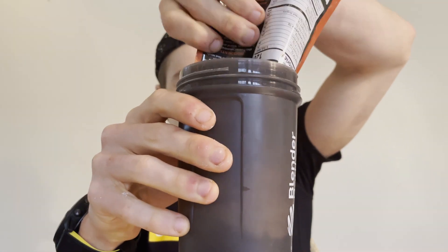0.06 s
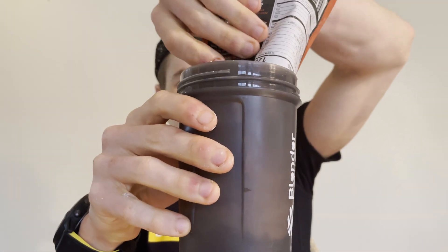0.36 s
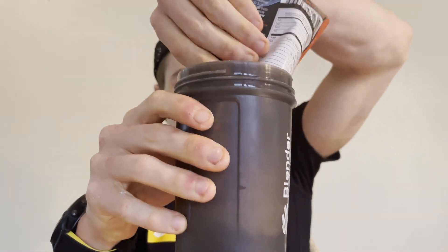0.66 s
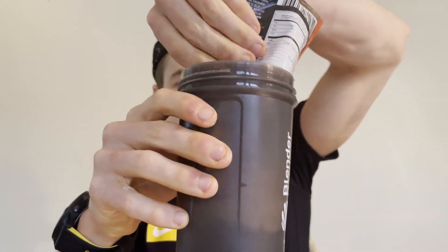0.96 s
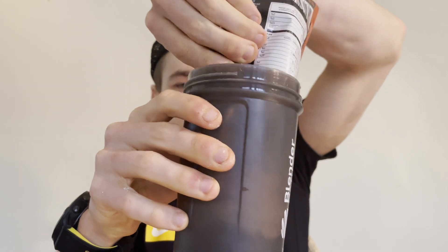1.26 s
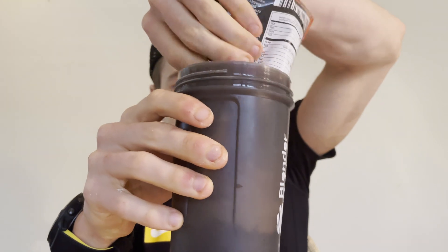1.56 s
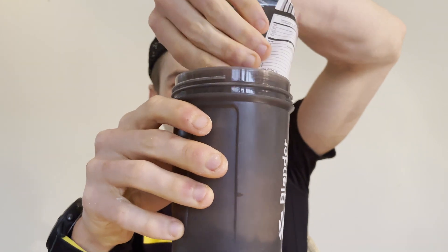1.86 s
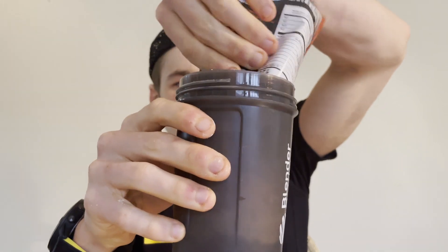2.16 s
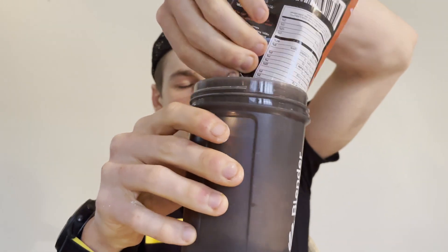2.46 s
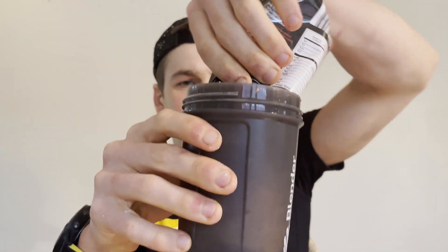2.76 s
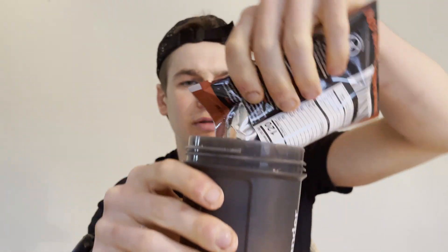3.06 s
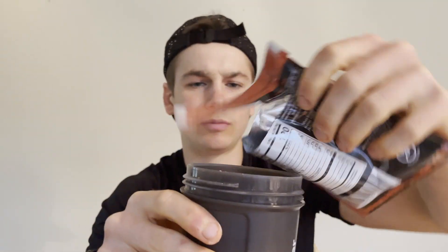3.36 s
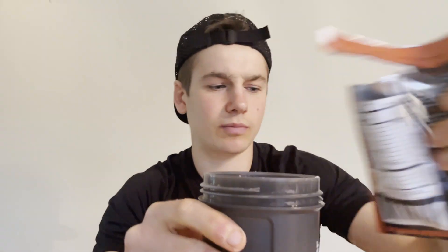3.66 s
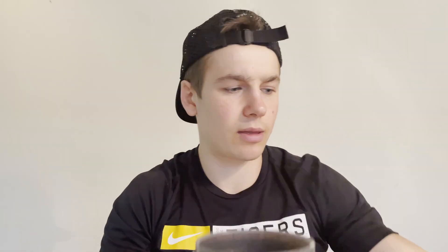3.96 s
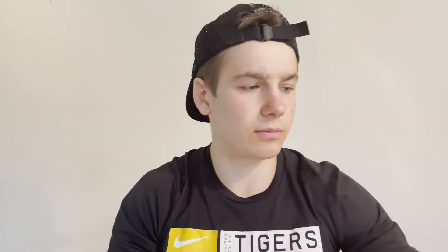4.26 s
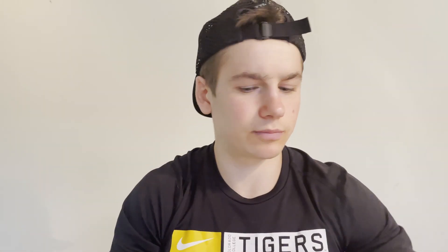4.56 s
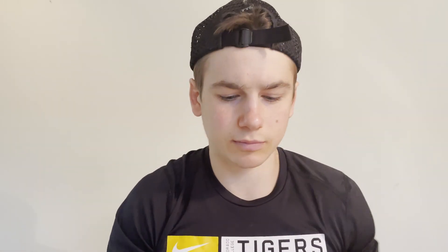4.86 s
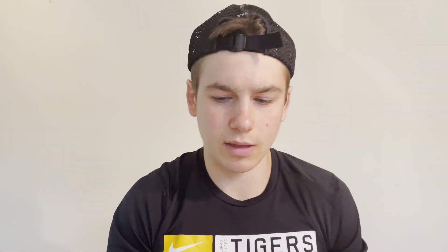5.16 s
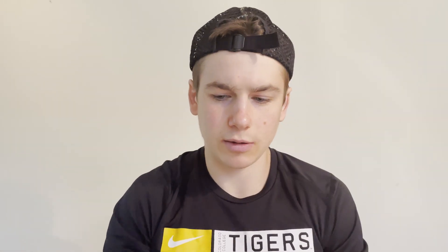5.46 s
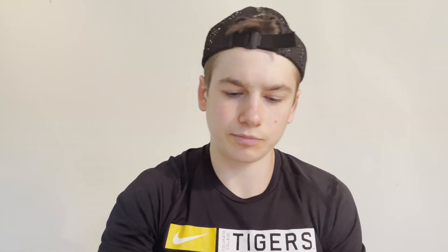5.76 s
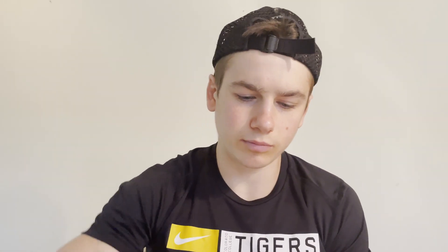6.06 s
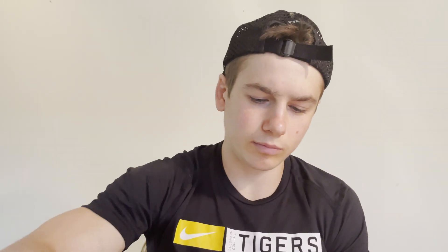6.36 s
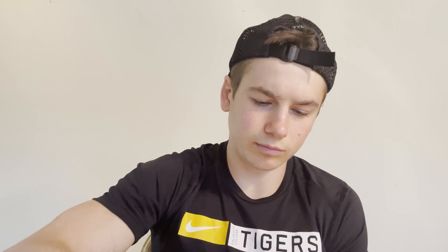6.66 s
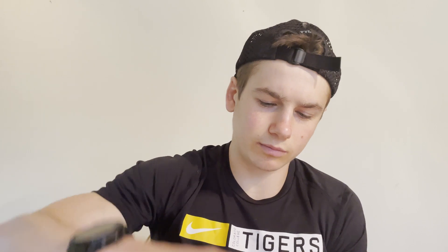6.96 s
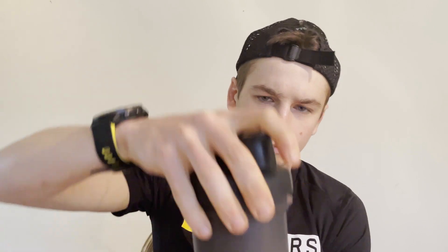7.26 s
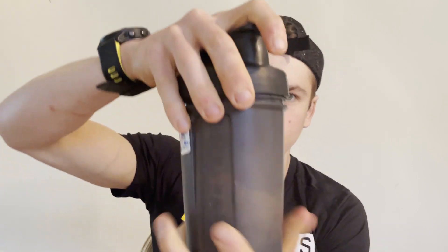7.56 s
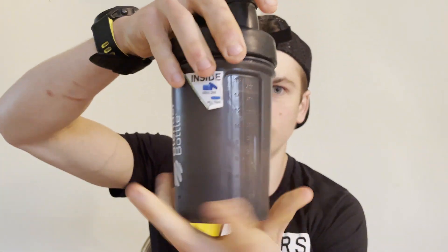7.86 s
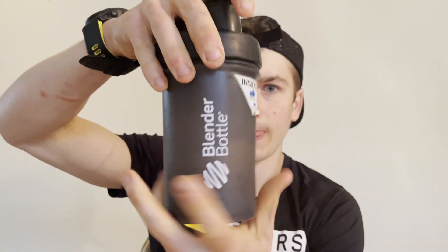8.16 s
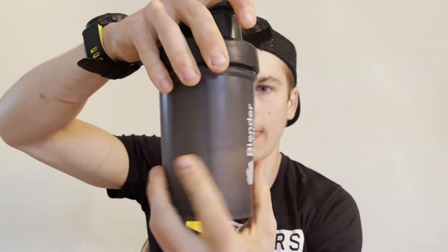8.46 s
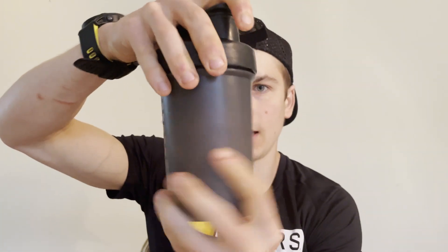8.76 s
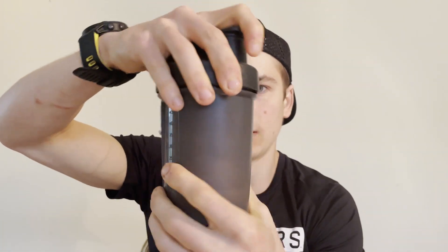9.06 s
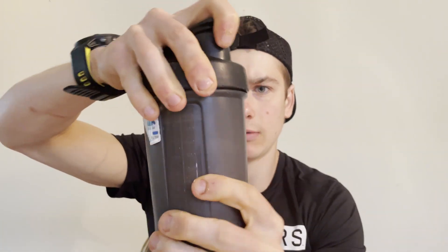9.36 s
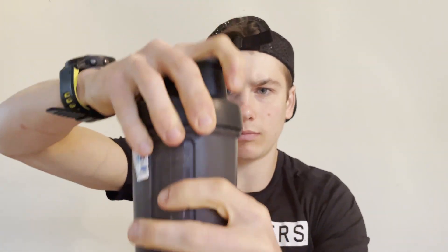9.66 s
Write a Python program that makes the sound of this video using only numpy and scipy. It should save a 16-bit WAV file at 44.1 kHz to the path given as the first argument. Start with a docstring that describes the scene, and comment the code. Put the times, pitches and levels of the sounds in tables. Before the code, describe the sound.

Close to a stereo microphone in a small room with a short echo, foil crinkles in quick shakes and powder slides into a plastic cup. After a brief rustle and a lull, the cup knocks hard on a ringing table, followed by several hollow lid clacks. A faint wire rattle follows, then quiet thread scraping, sliding fingers and light hollow taps as the lid is tightened.

```python
"""A table in a small room, a stereo microphone pair close to the hands. First a foil packet is shaken out
into a plastic shaker cup: the foil crackles and snaps as it buckles, and powder hisses down it.
Near 4.5 s the packet is laid aside; at 5.8 s the cup is knocked down on the table, then its lid clacks on.
At 7 s the cup is lifted and its wire whisk rings faintly. To the end it is turned hand over hand
to screw the lid tight, the thread scraping and the fingers sliding, over quiet room air."""
import sys
import numpy as np
from scipy import signal
from scipy.fft import rfft, irfft, next_fast_len
from scipy.io import wavfile

SR = 44100
rng = np.random.default_rng(int(sys.argv[2]) if len(sys.argv) > 2 else 0)


def store_wav(level_fs):
    """Save 16-bit WAV to argv[1]."""
    pcm = np.round(np.clip(np.atleast_2d(level_fs), -1, 1) * 32767)
    wavfile.write(sys.argv[1], SR, pcm.T.astype(np.int16))


N = 433062

# the foil buckles, close to the microphones: (time [s], level [dB], treble [dB], pitch [Hz])
SNAPS = [(0.006, -27, -3.5, 3290), (0.057, -19, -19.5, 1840), (0.164, -23.5, -27.5, 1910),
         (0.237, -17.5, -15.5, 1410), (0.307, -18.5, -17.5, 2050), (0.315, -22.5, -34.5, 660),
         (0.542, -20.5, -37, 626), (0.665, -27.5, -17.5, 660), (0.766, -22, -32.5, 1460),
         (0.915, -26, -13, 1430), (0.944, -26, -35, 650), (1.04, -23, -44, 1450), (1.113, -28.5, -20, 1520),
         (1.238, -29, -20, 1350), (1.349, -26.5, -21, 720), (1.433, -22.5, -48, 1380),
         (1.469, -17, -28, 1980), (1.624, -19, -21.5, 630), (1.655, -23, -16, 670),
         (2.047, -19.5, -26, 1390), (2.236, -21.5, -21, 650), (2.389, -26, -29, 1930),
         (2.54, -26.5, -47, 690), (2.69, -28.5, -21, 1780), (2.856, -25.5, -23, 1400),
         (2.961, -23.5, -26, 625), (2.976, -27.5, -35.5, 570), (3.02, -19, -69, 1390),
         (3.211, -32, -22, 1420), (3.27, -25.5, -29.5, 1300), (3.409, -19, -21, 1650),
         (3.443, -31.5, -15, 750), (3.552, -35, -22, 2140), (3.587, -64, 3, 2260), (3.686, -72, 1, 2820),
         (3.805, -46.5, -14.5, 1580), (3.987, -61.5, -2.5, 2000), (4.062, -55.5, -4.5, 2400),
         (4.388, -46.5, -8.5, 1040), (4.526, -40, 1.5, 1020), (4.611, -29.5, -18.5, 1170),
         (4.765, -47, -3, 3500), (5.146, -66.5, 2.5, 3930), (5.261, -54.5, -4, 1880)]
# spectrum of one snap: (frequency [Hz], level [dB])
SNAP_COLOUR = [(47, -49.5), (80, -4), (615, -3), (896, 0.5), (1530, 1), (1740, -9), (2040, 2), (3000, -7),
               (6590, -17), (9820, -25.5), (14600, -26.5), (16000, -50)]
# resonances of the foil at the cup's mouth: (frequency [Hz], level [dB], t60 [s])
FOIL_MODES = [(325.5, -12, 0.087), (592, -19.5, 0.045), (627, -6.5, 0.069), (1425, -3, 0.012),
              (1561, 3.5, 0.045), (1964, 1.5, 0.043), (2284, -7.5, 0.06), (2420, -16, 0.031)]
def foil_snaps(delay_s=.004, loss_db=8.5, pitch_ratio=1.4, bass_db=-34):
    """Each buckle of the foil sets off a weaker one in the facet beside it."""
    rows = []
    for (s, db, treble_db, hz), (late, detune) in zip(SNAPS, rng.uniform(.6, 1.4, (len(SNAPS), 2))):
        rows.append((s, db, treble_db, bass_db, hz))
        rows.append((s + late * delay_s, db - loss_db, treble_db, bass_db, hz * pitch_ratio * detune))
    return blows(rows, SNAP_COLOUR, FOIL_MODES, spread_s=.0018,
                 patch_db=8.5, ring_db=0, body_db=-30, treble_db=-17.5, bass_db=-13)


# shakes over the cup: (time [s], hold [s], crinkle [dB], powder hiss [dB])
SHAKES = [(0.002, 0.005, -30.5, -43), (0.237, 0.054, -43, -40.5), (0.535, 0.036, -43, -46),
          (0.677, 0.072, -36.5, -45.5), (0.895, 0.026, -43.5, -46), (1.035, 0.08, -40.5, -50),
          (1.255, 0.075, -39, -44.5), (1.44, 0.085, -37, -43.5), (1.66, .02, -38.5, -43.5),
          (1.787, 0.072, -40, -48), (2.005, 0.065, -34.5, -43), (2.183, 0.081, -37.5, -46.5),
          (2.415, 0.069, -32.5, -45), (2.59, 0.056, -33, -42.5), (2.964, 0.0083, -43, -53),
          (3.412, 0.014, -52, -55.5)]
SHAKE_RISE_DB_PER_S, SHAKE_FALL_DB_PER_S = 599, 349.5
# the foil stirs in the hand and loose powder trickles inside it: (time [s], level [dB])
HOLDING = [(0, -51.5), (2.65, -58), (2.78, -54.5), (3.05, -61), (3.18, -69), (3.25, -56.5), (3.45, -67.5),
           (3.7, -73.5), (4.3, -76.5), (4.92, -98), (5.15, -95.5), (5.4, -81), (5.65, -86.5)]
TRICKLE = [(0, -61.5), (2.7, -60), (3.17, -74.5), (3.5, -72.5), (4.1, -68), (4.22, -73.5), (4.75, -71),
           (4.9, -99), (5.6, -100.5)]
# spectra of crinkling foil and sliding powder: (frequency [Hz], level [dB])
FOIL_COLOUR = [(80, -13), (200, -11), (330, -3), (480, -12), (650, -1.5), (860, -11.5), (1150, -14),
               (1420, -1), (1720, -13), (2000, -2.5), (3200, -13.5), (6700, -22), (10000, -25),
               (15000, -22)]
POWDER_COLOUR = [(2500, -6), (4500, -0.5), (6700, 3.5), (9000, -1.5), (10500, -4), (12500, 3),
                 (16000, -2.5)]
def pouring():
    """Every shake sends a swarm of crinkles into the cup's mouth; powder slides, relaxing foil ticks."""
    shaken, poured = strokes(SHAKES, SHAKE_RISE_DB_PER_S, SHAKE_FALL_DB_PER_S)
    crinkle, trickle = np.hypot(shaken, gain_curve(HOLDING)), gain_curve(TRICKLE)
    creases = crinkle * grains(per_s=1500, spread_db=2)
    strength = np.sqrt(np.mean(creases ** 2))
    mouth = amp(-15) * unit(signal.oaconvolve(creases, ringing(FOIL_MODES, SR // 5))[:N])
    crackle = amp(-9) * colour(creases, FOIL_COLOUR)
    flipping = amp(-7) * colour(crinkle * facets(), FOIL_COLOUR)
    hiss = colour(grains(per_s=2300, spread_db=2.5), POWDER_COLOUR)
    powder = amp(-2) * np.hypot(poured, trickle) * hiss
    ticks = amp(-1) * trickle * colour(grains(per_s=31, spread_db=2), POWDER_COLOUR)
    return strength * (crackle + mouth + flipping) + powder + ticks


def facets(t60_cycles=22):
    """Each flipping facet of foil rings briefly at a pitch of its own; rms 1."""
    out = np.zeros(N)
    for hz in np.geomspace(550, 4500, 14):
        flips = grains(per_s=22, spread_db=3)
        ring = unit(ringing([(hz, 0, t60_cycles / hz)], SR // 25))
        out += signal.oaconvolve(flips, ring)[:N]
    return unit(out)


# the cup meets the table: (time [s], level [dB], treble [dB], bass [dB], pitch [Hz])
KNOCKS = [(5.733, -22, -23.5, -12, 4480), (5.797, -7, -41, -30, 1150), (5.807, -13, -36, -9.5, 840),
          (6.668, -30.5, -19, 0, 430)]
# spectrum of one knock: (frequency [Hz], level [dB])
TABLE_COLOUR = [(29, -46), (50, -16.5), (87, -12.5), (246, -15.5), (362, -1), (439, -13.5), (586, 0.5),
                (1120, -1), (1820, -18), (2210, -21), (2810, -31.5), (6240, -54), (9410, -67.5),
                (16000, -68.5)]
# resonances of the table under the cup: (frequency [Hz], level [dB], t60 [s])
TABLE_MODES = [(134, -21.5, 1), (245, -22.5, 0.55), (400, -19.5, 1), (546, -4, 0.071), (606, -5.5, 0.4),
               (770, 0, 0.32), (853, -6, 0.28), (970, -8, 0.3), (1110, -7.5, 0.28), (1140, -29, 0.96),
               (1564, -7.5, 0.26), (1530, -23.5, 0.34), (1680, -34.5, 0.33), (2126, -30, 0.3)]
def cup_knocks():
    """The cup lands on one edge, then flat, and the table rings."""
    return blows(KNOCKS, TABLE_COLOUR, TABLE_MODES, spread_s=.0012,
                 patch_db=-6, ring_db=-8, body_db=-23, treble_db=-6, bass_db=-18.5)


# the lid strikes the rim: (time [s], level [dB], treble [dB], bass [dB], pitch [Hz])
CLACKS = [(6.12, -25, -29, -29, 550), (6.142, -10.5, -21, -16, 1950), (6.331, -14.5, -19.5, -17.5, 800),
          (6.405, -22, -30, -15.5, 390), (6.417, -22, -29, -16, 374), (6.432, -12, -22, -23, 3116),
          (6.841, -46.5, -33, -17, 795), (8.539, -57.5, -11.5, -0.5, 793), (8.972, -41.5, -9.5, -31, 2100),
          (8.995, -50, -15, -36, 894), (9.116, -47, -19, -24.5, 2030), (9.145, -40, -17.5, -21, 1540),
          (9.638, -51.5, -14, -16, 770)]
# spectrum of one clack: (frequency [Hz], level [dB])
LID_COLOUR = [(29, -38.5), (50, -19), (306, 5), (472, -12.5), (1270, -9), (1960, -18.5), (2560, -15.5),
              (3100, -14.5), (5530, -19), (6710, -22), (9180, -31.5), (14900, -29.5), (16000, -48)]
# resonances of the lid: (frequency [Hz], level [dB], t60 [s])
LID_MODES = [(140, 1, .14), (250, -6, .08), (335, 1, .09), (535, -1, .06), (780, -4, .06), (1040, 2, .025),
             (1900, -3, .008), (2850, -6, .012), (3400, -6, .012)]
def lid_clacks():
    """The hollow lid clatters onto the rim, and later clicks softly as it is tightened."""
    return blows(CLACKS, LID_COLOUR, LID_MODES, spread_s=.0013,
                 patch_db=3, ring_db=-3, body_db=-25.5, treble_db=-10.5, bass_db=-12)


# turns of the cup under its lid: (time [s], hold [s], thread scrape [dB], sliding skin [dB])
TURNS = [(7.325, 0.068, -58.5, -60), (7.41, 0.056, -52, -53), (7.62, 0.036, -73.5, -71),
         (7.775, 0.023, -58.5, -59.5), (8.095, 0.054, -66, -61), (8.36, 0.028, -62.5, -63),
         (8.615, 0.039, -56, -60.5), (8.845, 0.04, -51.5, -53), (8.99, 0.013, -49, -60),
         (9.165, 0.21, -54.5, -64.5), (9.33, .11, -57, -67), (9.545, 0.028, -79, -59.5),
         (9.68, 0.064, -77, -60.5)]
# rumble of the hands carrying the cup: (time [s], level [dB])
CARRYING = [(6.7, -37), (6.88, -53.5), (7.04, -77.5), (7.1, -62), (7.5, -55), (8.9, -55.5), (9.3, -80),
            (9.82, -68)]
# spectra of thread, skin and handling rumble: (frequency [Hz], level [dB])
THREAD_COLOUR = [(250, -19), (600, -5), (950, 1.5), (1200, -4.5), (1500, 1), (2100, -0.5), (3000, -9),
                 (5000, -7), (9000, -48)]
SKIN_COLOUR = [(1500, -7.5), (3000, -6.5), (4500, -5), (6500, -0.5), (9000, -9.5), (10500, -11),
               (12500, -3), (16000, -12.5)]
RUMBLE_COLOUR = [(30, -28), (65, -5), (140, -7), (250, -6), (400, -16.5), (900, -36)]
def screwing():
    """The thread scrapes round, fingers slide on the wall, and the cup rumbles in the hands."""
    scrape, slide = strokes(TURNS, rise_db_per_s=399, fall_db_per_s=228)
    turning = amp(-59) * (scrape / scrape.max()) ** .4   # follows 40% of the scrape's swing in dB
    handling = np.hypot(gain_curve(CARRYING), turning)
    thread = amp(-4.5) * scrape * colour(grains(per_s=4000, spread_db=3), THREAD_COLOUR)
    skin = slide * colour(rng.standard_normal(N), SKIN_COLOUR)
    rumble = amp(-12.5) * handling * colour(rng.standard_normal(N), RUMBLE_COLOUR)
    return thread + skin + rumble


# light touches on the cup: (time [s], level [dB], treble [dB], bass [dB], pitch [Hz])
BUMPS = [(1.255, -38.5, -40, -23, 151), (1.851, -30, -17, -26.5, 350), (2.017, -39.5, -23, -27, 278),
         (7.076, -56, -28.5, -1.5, 231), (7.147, -72.5, -12, 15.5, 143.4), (7.169, -70, -7, -2, 109),
         (7.215, -55.5, -21, -2.5, 159), (7.311, -62.5, 2.5, 2.5, 269), (7.928, -51, -21.5, -4.5, 147.8),
         (8.087, -36, -28, -22.5, 244), (8.214, -51, -23.5, -8, 160.5), (8.38, -37, -32, -22, 149),
         (8.429, -45, -34, -23, 103), (8.569, -45, -24, -18, 386), (8.631, -35.5, -36, -23, 199),
         (8.654, -45.5, -10.5, -33, 725), (8.797, -46, -24, -16, 278), (8.845, -37.5, -24, -24, 318)]
# spectrum of one touch: (frequency [Hz], level [dB])
BUMP_COLOUR = [(29, -40), (50, -7), (189, 5.5), (586, -2), (765, 0.5), (1180, -10), (2060, -12),
               (2560, -30.5), (4350, -31.5), (16000, -53)]
# resonances of the cup: (frequency [Hz], level [dB], t60 [s])
CUP_MODES = [(107.5, -51, 0.16), (156.4, -16, 0.23), (284, 7.5, 0.14), (430, 10, 0.22), (577, -35, 0.035),
             (770, -25, 0.084)]
def cup_bumps():
    """The packet or a finger bumps the cup, which answers with a low, hollow ring."""
    return blows(BUMPS, BUMP_COLOUR, CUP_MODES, spread_s=.0033,
                 patch_db=1.5, ring_db=-8, body_db=-24.5, treble_db=-12.5, bass_db=-3)


# the packet is pushed about on the table: (time [s], hold [s], level [dB])
PUSHES = [(4.395, 0.026, -51.5), (4.46, 0.02, -46), (4.525, 0.012, -45.5), (4.605, 0.014, -45.5),
          (4.73, 0.032, -47), (5.268, 0.0086, -65.5)]
# spectrum of its rustle: (frequency [Hz], level [dB])
PUSH_COLOUR = [(60, -8.5), (130, 1), (260, 1.5), (400, -3), (930, -5), (1130, 1), (1350, -6.5), (2500, -7),
               (5000, -15), (9000, -15.5), (15000, -26)]
def laying_aside():
    """The empty packet rustles against the table top."""
    push, = strokes(PUSHES, SHAKE_RISE_DB_PER_S, SHAKE_FALL_DB_PER_S)
    return amp(-2.5) * push * colour(grains(per_s=2300, spread_db=4.5), PUSH_COLOUR)


# cup and lid drag: (time [s], level [dB])
DRAG = [(5.73, -77.5), (5.742, -39), (5.79, -46), (5.8, -101.5), (6.114, -99), (6.122, -36.5),
        (6.142, -34.5), (6.15, -89), (6.6, -86), (6.635, -51), (6.665, -38.5), (6.69, -81)]
# spectrum of the judder: (frequency [Hz], level [dB])
DRAG_COLOUR = [(60, -13), (120, -5), (250, -4.5), (550, 0.5), (800, -8.5), (1400, -9), (2000, -16),
               (5000, -29.5), (12000, -46)]
def dragging():
    """Plastic judders along the table and the rim just before it settles."""
    return gain_curve(DRAG) * colour(grains(per_s=1800, spread_db=-6), DRAG_COLOUR)


# the whisk's rattle, faint even this close: (time [s], level [dB])
WHISK = [(7.07, -94), (7.08, -57), (7.14, -66.5), (7.29, -66.5), (7.34, -83)]
# resonances of its wires: (frequency [Hz], level [dB], t60 [s])
WHISK_MODES = [(950, -4, .015), (1500, -4, .015), (1960, -3, .04), (2150, -3, .035), (2750, -4, .02),
               (11500, -19, .02)]
def whisk():
    """The wire ball inside rattles as the cup is lifted."""
    wires = ringing(WHISK_MODES, SR // 4, scatter_db=1)
    taps = grains(per_s=1300, spread_db=1.5)
    return gain_curve(WHISK) * unit(signal.oaconvolve(taps, wires)[:N])


# decay of the small room: (frequency [Hz], t60 [s])
ROOM_T60 = [(100, .5), (300, 0.5), (800, 0.65), (2000, 0.55), (5000, 0.64), (14000, 0.52)]
# its echo at the microphones: (frequency [Hz], energy re direct sound [dB])
ROOM_DB = [(100, 5), (300, -5), (800, -5.5), (2000, -6), (5000, -2), (14000, -12.5)]
def room_echo(first_s=.00079, early_db=7.5, early_s=.054, bands=12):
    """The room's impulse response: strong early reflections, then a diffuse tail dying band by band."""
    t = np.arange(SR * 3 // 4) / SR
    hz = np.fft.rfftfreq(len(t), 1 / SR)
    centres, out = np.geomspace(70, 15000, bands), 0
    onset = np.clip(t / first_s - 1, 0, 1) * (1 + amp(early_db) * np.exp(-t / early_s))
    for centre, share in zip(centres, np.eye(bands)):
        weight = np.sqrt(at_hz(np.c_[centres, share], hz))   # neighbouring bands cross at equal power
        noise = irfft(weight * rfft(rng.standard_normal(len(t))), len(t))
        tail = unit(noise * onset * amp(-60 * t / at_hz(ROOM_T60, centre)))
        out = out + amp(at_hz(ROOM_DB, centre)) * tail * np.sqrt(np.mean(weight ** 2) / len(t))
    return out


# spectrum of the room tone: (frequency [Hz], level [dB])
AIR_COLOUR = [(15, -44), (25, -19.5), (48, -1.5), (87, 0), (145, 2.5), (301, -15), (695, -21.5),
              (1260, -31.5), (1840, -26), (2550, -32), (4250, -36), (10400, -41.5), (16000, -31.5)]
def room_air():
    """Quiet room air: a steady low rumble with a trace of hiss."""
    return amp(-67) * colour(rng.standard_normal(N), AIR_COLOUR)


def blows(rows, spectrum, modes, spread_s, patch_db, ring_db, body_db, treble_db, bass_db, size=12000):
    """Each contact is shaped by the body, whose modes ring on; the struck patch rings for a few cycles."""
    out, t = np.zeros(N), np.arange(size) / SR
    attack = 1 - np.exp(-t / spread_s)
    for s, level_db, bright_db, heavy_db, patch_hz in rows:
        ring = amp(ring_db) * unit(ringing(modes, size, scatter_db=3))
        patch = amp(patch_db) * unit(ringing([(patch_hz, 0, 14 / patch_hz)], size))
        hit = colour(contact(spread_s, size), spectrum) + (ring + patch) * attack
        # hard contacts bring out the treble, heavy ones the bass
        body = amp(body_db) * unit(band(hit, [300, 4000], "band"))
        treble = amp(bright_db + treble_db) * unit(band(band(hit, 3500, "high"), 3500, "high"))
        bass = amp(heavy_db + bass_db) * unit(band(band(hit, 300, "low"), 300, "low"))
        start = round(s * SR)
        out[start:start + size] += amp(level_db) * (body + treble + bass)[:N - start]
    return out


def contact(spread_s, size):
    """A click smeared over a few ms: every frequency leaves the flexing wall at a moment of its own."""
    hz = np.fft.rfftfreq(2 * size, 1 / SR)
    knots = np.linspace(0, SR / 2, 64)
    delay = np.interp(hz, knots, spread_s * rng.rayleigh(1, len(knots)))
    return unit(irfft(np.exp(-2j * np.pi * np.cumsum(delay) * hz[1]))[:size])


def ringing(modes, size, scatter_db=0):
    """Decaying sines, each struck with a random sign and a strength scattered by scatter_db."""
    t = np.arange(size) / SR
    hz, db, t60 = np.transpose(modes)[:, :, None]
    strength = amp(db + scatter_db * rng.standard_normal(hz.shape)) * rng.choice([-1, 1], hz.shape)
    return np.sum(strength * amp(-60 * t / t60) * np.sin(2 * np.pi * hz * t), axis=0)


def grains(per_s, spread_db):
    """Tiny clicks of uneven strength at random moments; rms 1."""
    sizes = amp(spread_db * np.minimum(rng.exponential(1, N), 4))
    return unit(sizes * rng.choice([-1, 1], N) * (rng.random(N) < per_s / SR))


def strokes(rows, rise_db_per_s, fall_db_per_s):
    """Each stroke of the hand swells, holds and dies away; one gain curve per dB column."""
    t, curves = np.arange(N) / SR, 0
    for s, hold_s, *levels_db in rows:
        shape_db = np.minimum(rise_db_per_s * (t - s), fall_db_per_s * (s + hold_s - t))
        curves = np.maximum(curves, np.outer(amp(levels_db), amp(np.clip(shape_db, -120, 0))))
    return curves


def gain_curve(rows):
    """Gain through (time [s], level [dB]) points, silent outside them."""
    return amp(np.interp(np.arange(N) / SR, *np.transpose(rows), left=-120, right=-120))


def colour(x, spectrum, size=4096):
    """Causal (minimum-phase) filter with the given spectrum; rms 1."""
    cepstrum = irfft(np.log(amp(at_hz(spectrum, np.fft.rfftfreq(size, 1 / SR)))))
    cepstrum[1:size // 2] *= 2
    cepstrum[size // 2 + 1:] = 0
    return unit(signal.oaconvolve(x, irfft(np.exp(rfft(cepstrum))))[:len(x)])


def band(x, hz, kind):
    """Butterworth filter."""
    return signal.sosfilt(signal.butter(2, hz, kind, fs=SR, output="sos"), x)


def at_hz(points, hz):
    """Read a table along a log-frequency axis."""
    f, value = np.transpose(points)
    return np.interp(np.log(np.maximum(hz, 1)), np.log(np.maximum(f, 1)), value)


def amp(db):
    """Decibels to gain."""
    return 10 ** (np.asarray(db) / 20)


def unit(x):
    """Scale to rms 1."""
    return x / np.sqrt(np.mean(x ** 2) + 1e-24)


# where the hands work before the pair: (time [s], bearing [0 = centre, 1 = a little left])
BEARING = [(0, 0.76), (3.4, 0.64), (3.9, 0.9), (5.3, 0), (5.7, 0.6), (6.0, 2.3), (6.101, 0.73),
           (9.799, 0.88)]
# the pair's width for direct sound at bearing 1, and for echoes: (frequency [Hz], side re mid [dB])
SIDE_DIRECT = [(100, -18), (700, -6.5), (2000, -2.5), (3300, 8), (5000, 0.5), (8500, 5), (10500, 10.5),
               (12000, -7), (16000, -20.5)]
SIDE_ECHO = [(100, -11), (300, -4.5), (700, 0.5), (2000, -0.5), (5000, 0), (9000, -3), (10500, 8),
             (12000, -13), (16000, -16.5)]
# lead of side over mid for direct sound: (frequency [Hz], phase [rad])
SIDE_PHASE = [(100, -0.2), (600, 0.52), (2000, 1.3), (3000, 1.54), (3800, 1), (5700, 0.5), (7000, -2.5),
              (8200, -0.26), (9300, -2), (10300, -5), (13000, -4.5), (15500, -4.5)]
# the mid dips where the two microphone ports cancel: (frequency [Hz], width [Hz], depth [0-1])
PORT_DIPS = [(5590, 380, 1), (7450, 400, 1)]
def scene():
    """The hands work close to a microphone pair, with the small room's echo and air behind them."""
    packet = pouring() + foil_snaps() + laying_aside()
    sources = packet + cup_knocks() + lid_clacks() + dragging() + screwing() + cup_bumps() + whisk()
    size = next_fast_len(N + SR)
    hz = np.fft.rfftfreq(size, 1 / SR)
    direct = rfft(sources, size)
    off_axis = rfft(sources * np.interp(np.arange(N) / SR, *np.transpose(BEARING)), size)
    mid_echo, side_echo = [direct * rfft(room_echo(), size) for _ in range(2)]
    mid_air, side_air = [rfft(room_air(), size) for _ in range(2)]
    mid = direct + mid_echo + mid_air
    # sound reaches the nearer port earlier and louder
    side = amp(at_hz(SIDE_DIRECT, hz)) * np.exp(1j * at_hz(SIDE_PHASE, hz)) * off_axis
    side += amp(at_hz(SIDE_ECHO, hz)) * (side_echo + side_air)
    for dip_hz, width_hz, depth in PORT_DIPS:
        mid *= 1 - depth / (1 + 2j * (hz - dip_hz) / width_hz)
    return irfft(np.array([mid + side, mid - side]), size)[:, :N]


def record(dry, ceiling=.85, low_cut_hz=42, high_cut_hz=16200):
    """Peaks are rounded, the deepest bass is rolled off and the top is cut steeply."""
    rounded = ceiling * np.tanh(dry / ceiling)
    high_cut = signal.ellip(10, .2, 70, high_cut_hz, fs=SR, output="sos")
    return signal.sosfilt(high_cut, band(rounded, low_cut_hz, "high"))


dry = scene()
out = record(dry)
store_wav(out)
```